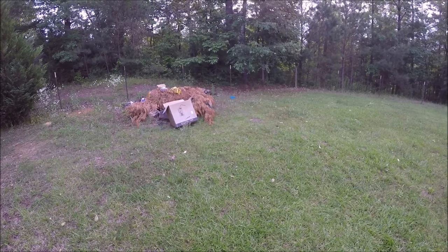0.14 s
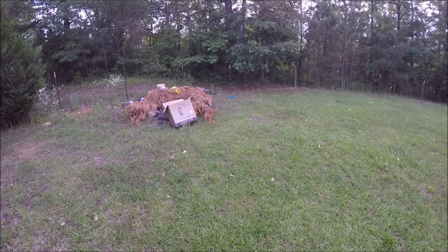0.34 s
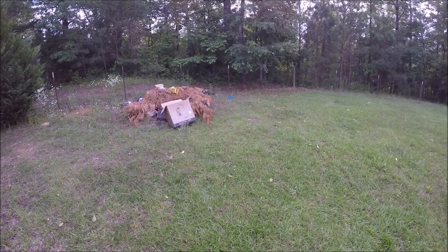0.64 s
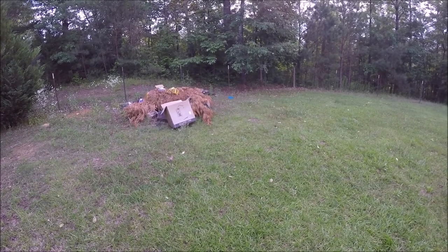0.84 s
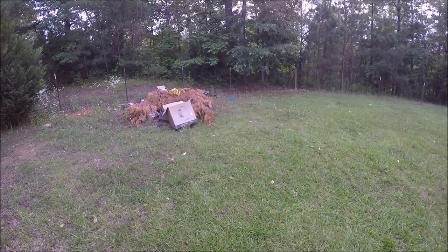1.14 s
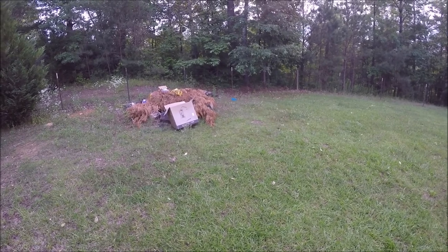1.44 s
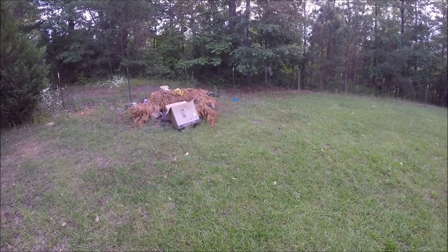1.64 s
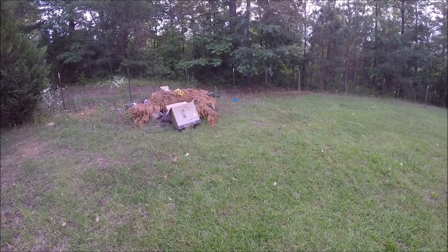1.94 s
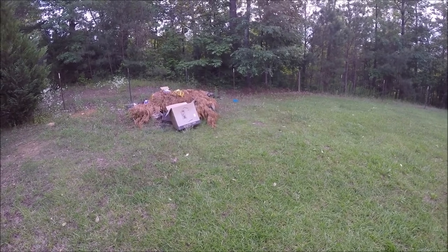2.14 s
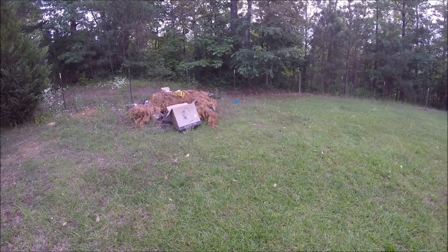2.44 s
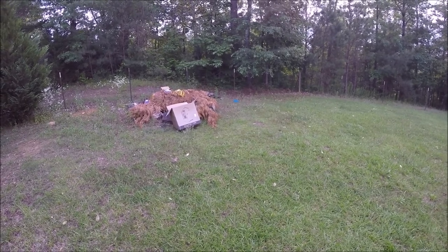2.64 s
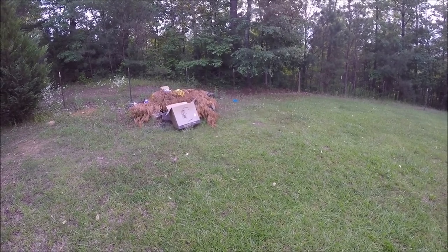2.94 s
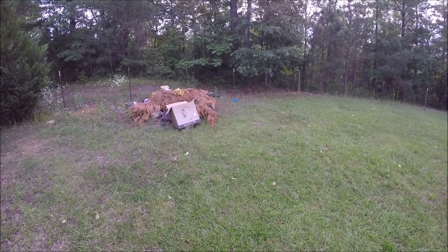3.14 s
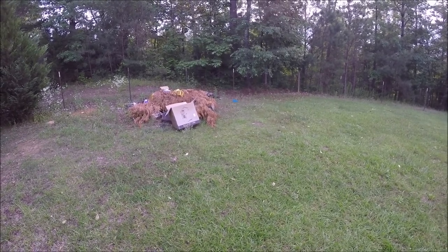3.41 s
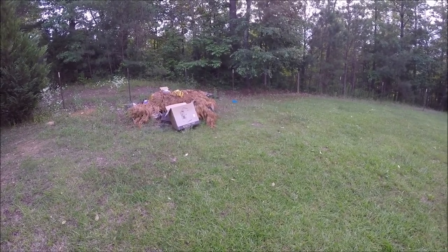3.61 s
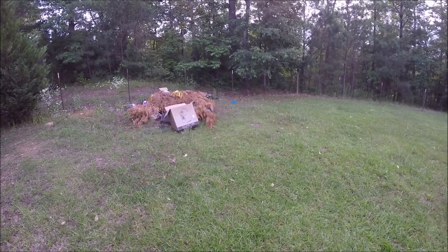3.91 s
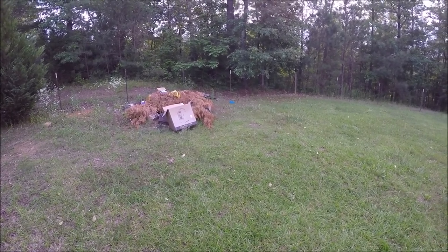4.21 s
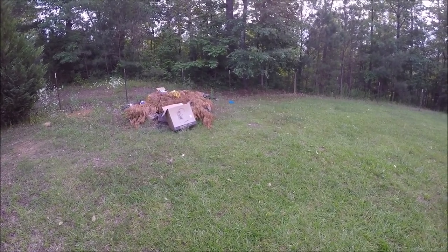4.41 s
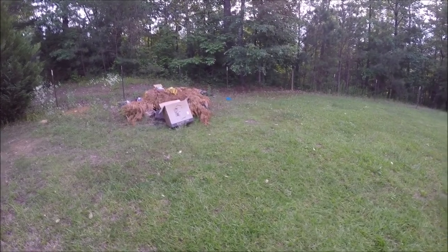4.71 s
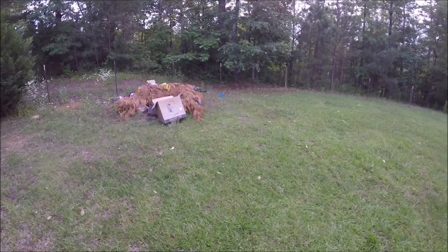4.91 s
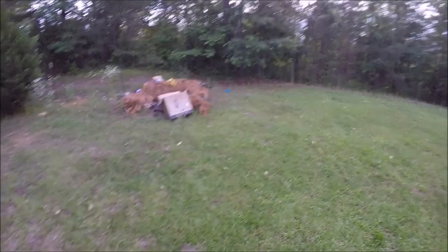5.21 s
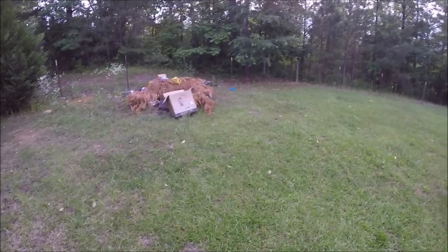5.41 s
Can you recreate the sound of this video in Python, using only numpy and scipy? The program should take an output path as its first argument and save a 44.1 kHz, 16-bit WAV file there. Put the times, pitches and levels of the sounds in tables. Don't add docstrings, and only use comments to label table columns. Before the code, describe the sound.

A close outdoor take beside an electric airsoft rifle, in a yard backed by trees. Faint air and a distant low engine hum, then a trigger click near 0.2 s and a brief motor wind-up. From 0.24 to 1.1 s, twelve sharp plastic-metal cracks rattle evenly with gear whine, the first ones loudest; each pellet smacks a hollow cardboard box about 55 ms after its shot. A soft woodland tail dies away. After a click at 1.48 s, thirteen more shots run from 1.56 to 2.5 s, with duller, drummier box hits. Small clicks and a low knock come around 2.6 s. The longest burst, nineteen shots, runs from 2.94 to 4.35 s; from about 3.9 s the hits mostly stop and the shots turn to hollow empty pops. The tail fades into quiet. From 5.0 s cloth rubs, a strap knocks at 5.25 s, and rustling, breeze and engine hum rise to the end at 5.5 s.

```python
import sys
import numpy as np
from scipy import signal
from scipy.fft import rfft, irfft, next_fast_len
from scipy.io import wavfile
from scipy.ndimage import uniform_filter1d

SR = 44100
rng = np.random.default_rng(int(sys.argv[2]) if len(sys.argv) > 2 else 0)


def natural_amplitude(level_db):
    exponent = np.asarray(level_db, float) / 20
    return 10 ** exponent


def transcribe(u):
    v = np.clip(np.atleast_2d(u).T, -1, 1)
    q = np.round(v * 32767).astype(np.int16)
    wavfile.write(sys.argv[1], SR, q)


N = 244843
AGE = np.arange(4000) / SR
CRACK_DB = -12.3

ROUNDS = [12, 13, 19]
EMPTY = [37, 39, 40, 41, 42, 43]


def amp_rms(x, db):
    return natural_amplitude(db) * x / np.sqrt(np.mean(x ** 2) + 1e-20)


def early_rms(x, db, size):
    return natural_amplitude(db) * x / np.sqrt(np.mean(x[:size] ** 2))


def coloured(spectrum, size):
    fast, points = next_fast_len(size), np.array(spectrum)
    hz = np.fft.rfftfreq(fast, 1 / SR) + 1
    gain_db = np.interp(np.log(hz), np.log(points[:, 0]), points[:, 1], left=-90, right=-90)
    noise = irfft(rfft(rng.standard_normal(fast)) * natural_amplitude(gain_db), fast)
    return amp_rms(noise[:size], 0)


def drift(rate_hz):
    return coloured([(1, 0), (rate_hz, 0), (4 * rate_hz, -24)], N)


def level(rows, column=1):
    rows = np.array(rows)
    return natural_amplitude(np.interp(np.arange(N) / SR, rows[:, 0], rows[:, column], left=-150, right=-150))


def struck(modes, vary_db=0, detune=0):
    hz, db, t60 = np.array(modes).T[:, :, None]
    chance = rng.standard_normal((2, len(modes), 1))
    waves = np.sin(2 * np.pi * hz * (1 + detune * chance[0]) * AGE)
    return np.sum(natural_amplitude(db + vary_db * chance[1] - 60 * AGE / t60) * waves, axis=0)


def puff(low_hz, high_hz, t60):
    band = signal.butter(2, [low_hz, high_hz], "band", fs=SR, output="sos")
    noise = signal.sosfilt(band, rng.standard_normal(len(AGE)))
    return amp_rms(noise, 0) * natural_amplitude(-60 * AGE / t60)


def add(track, s, sound):
    i = round(s * SR)
    track[i:i + len(sound)] += sound[:N - i]


def ground(x, taps, cut_hz):
    out, dull = x.copy(), signal.lfilter(*signal.butter(1, cut_hz, fs=SR), x)
    for s, db in taps:
        add(out, s, natural_amplitude(db) * dull)
    return out


def yard():
    # (time [s], frequency [Hz], level [dB])
    engine = [
        (0, 77, -7),
        (.35, 76.5, 6),
        (1.2, 79.5, -6.5),
        (1.598, 80, 0.5),
        (2.801, 77, -2),
        (3.1, 79, 4.5),
        (4.5, 78, -1),
        (4.85, 79, 10.5),
        (5.55, 80.5, 14),
    ]
    # (time [s], level [dB])
    breeze = [
        (0, 3.5),
        (.4, 0),
        (1.2, 0.5),
        (2.3, 0.5),
        (2.88, 6.5),
        (3.2, 4.5),
        (4.55, -7),
        (4.92, 2.5),
        (5.36, 12),
        (5.55, 10.5),
    ]
    # (frequency [Hz], density [dB/Hz])
    rumble_spectrum = [(13, -39), (22, -8.5), (49, 5.5), (65, 4), (86, -22), (95, 0), (119, -5),
                       (320, -49.5), (420, -68.5), (700, -120)]
    # (frequency [Hz], density [dB/Hz])
    air_spectrum = [(88, -42), (150, 2.5), (221, -7), (252, -3.5), (331, -18.5), (350, -15.5),
                    (1070, -11.5), (1230, -15.5), (5610, -28), (15000, -48)]
    clock = np.arange(N) / SR
    s, hz, line_db = np.transpose(engine)
    hz, line_db = np.interp(clock, s, hz), np.interp(clock, s, line_db)
    gust_db = np.interp(clock, *np.transpose(breeze))
    turn = 2 * np.pi * np.cumsum(hz + 1.55 * drift(6.2)) / SR
    hum = np.sqrt(2) * natural_amplitude(-56 + line_db + 2.3 * drift(9.3)) * np.sin(turn)
    rumble = natural_amplitude(-52.5 + 0.55 * gust_db + 4.3 * drift(11)) * coloured(rumble_spectrum, N)
    air = natural_amplitude(-57.5 + 0.73 * gust_db + 1.2 * drift(12)) * coloured(air_spectrum, N)
    return hum + rumble + air


def trees(x):
    # (frequency [Hz], density [dB/Hz])
    scatter = [(150, -14.5), (500, -9.5), (900, -1.5), (1050, -10.5), (1230, -4.5), (2500, -1.5), (4500, 6),
               (7000, 4.5), (15000, -13)]
    t60_s, reach_s, return_db = 0.99, 0.16, -16.5
    age = np.arange(30000) / SR
    shape = natural_amplitude(-60 * age / t60_s) * (1 - np.exp(-(age / 0.013) ** 2))
    hold = natural_amplitude(-5.5) + np.exp(-(age / reach_s) ** 4)
    tail = coloured(scatter, len(age)) * shape * hold
    return natural_amplitude(return_db) * signal.fftconvolve(x, tail / np.sqrt(np.sum(tail ** 2)))[:N]


def strokes():
    # (peak time [s], peak level [dB], rise [dB/s], fall [dB/s])
    sweeps = [
        (5.038, -59, 245, 23),
        (5.252, -51, 2900, 4300),
        (5.29, -46, 500, 300),
        (5.398, -45.5, 3195, 1000),
        (5.53, -43.5, 304, 200),
    ]
    clock = np.arange(N) / SR
    return sum(natural_amplitude(db - np.maximum(rise * (s - clock), fall * (clock - s))) for s, db, rise, fall in sweeps)


def handling():
    # (time [s], peak level [dB], frequency [Hz], t60 [s])
    ticks = [
        (0.169, -34, 1460, 0.0093),
        (0.187, -27, 1500, 0.0052),
        (1.481, -23, 1920, 0.0061),
        (2.589, -23, 4870, 0.0066),
        (2.653, -23, 1257, 0.013),
        (2.892, -36, 1436, 0.016),
        (5.25, -44.5, 882, 0.015),
        (5.269, -28, 915, 0.012),
    ]
    # (time [s], peak level [dB])
    rubs = [
        (5.0057, -48),
        (5.0258, -46),
        (5.0384, -41),
        (5.061, -45),
        (5.0901, -43),
        (5.111, -42),
        (5.275, -39.5),
        (5.3094, -51),
        (5.395, -49),
        (5.511, -43),
    ]
    # (time [s], level [dB])
    hollow = [
        (1.165, -70),
        (1.2, -42),
        (1.26, -55),
        (1.33, -61),
        (1.45, -80),
    ]
    # (frequency [Hz], density [dB/Hz])
    cloth = [(880, -45), (1500, 14), (1900, 5), (2920, 9), (3150, 9), (6960, 4), (13900, -5.5),
             (15500, -28)]
    out, slips = np.zeros(N), np.zeros(N)
    for s, db, hz, t60 in ticks:
        knock = struck([(hz, -3, t60), (1.55 * hz, -13, t60)])
        add(out, s, natural_amplitude(db) * (knock + natural_amplitude(-30) * puff(487, 7340, t60)))
    add(out, 5.2515, struck([(3895, -32, .0093), (6500, -52, .0063), (1500, -35, .012)]))
    add(out, 5.25, struck([(237, -37.5, 0.18), (151, -36, 0.083)]))
    add(out, 2.652, struck([(61.5, -30, 0.14)]))
    for s, db in rubs:
        add(slips, s, natural_amplitude(db - 4.5 - 60 * AGE / 0.045))
    rub = natural_amplitude(-5 + 2.7 * drift(53)) * strokes()
    ringing = level(hollow) * coloured([(960, -17), (1060, -10), (1160, -24)], N)
    rustle = coloured(cloth, N) * natural_amplitude(2.9 * drift(300) - 0.5) * (rub + slips)
    return out + ringing + rustle


def punch(burst, k):
    punch_db = [6.5, 6, 7.5]
    return punch_db[burst] * 0.6 ** k


def slams():
    peaks = [(0.24159), (0.32664), (0.40383), (0.47986), (0.55569), (0.63152), (0.70737), (0.78324),
             (0.85902), (0.93476), (1.0105), (1.09361), (1.56023), (1.64177), (1.71891), (1.79517),
             (1.87129), (1.94744), (2.02356), (2.09975), (2.17617), (2.25281), (2.3293), (2.40567),
             (2.48213), (2.94333), (3.03299), (3.11166), (3.18887), (3.26569), (3.34234), (3.41916),
             (3.49599), (3.57277), (3.64948), (3.72621), (3.80293), (3.87916), (3.95673), (4.0332),
             (4.11007), (4.18714), (4.26422), (4.34118)]
    slack = 38
    kind = {slack: (-16.5, -72), **{e: (-11, -22.5) for e in EMPTY}}
    rows = []
    for burst, count in enumerate(ROUNDS):
        for k in range(count):
            crack_db, pop_db = kind.get(len(rows), (CRACK_DB, -35))
            extra_db = punch(burst, k)
            rows.append((np.ravel(peaks)[len(rows)], crack_db + extra_db, pop_db + extra_db))
    return rows


def motor():
    # (length [s], start level [dB])
    wind_up = [
        (0.07, -50),
        (0.083, -43),
        (0.044, -54),
    ]
    bite_s, bite_db, run_db, sag_db_per_s = 0.03, -37.5, -34.5, 4.5
    let_go_s, coast_s, let_go_db, coast_db = 0.027, 0.051, -0.5, -23
    out, times = 0, np.split(np.array(slams())[:, 0], np.cumsum(ROUNDS))
    for (lead_s, start_db), (first, *_, last) in zip(wind_up, times):
        start = first - lead_s
        tired_db = run_db - sag_db_per_s * (last - first)
        out = out + level([(start, start_db), (start + bite_s, bite_db), (first, run_db),
                           (last - .1, tired_db), (last + let_go_s, tired_db + let_go_db),
                           (last + let_go_s + coast_s, tired_db + coast_db)])
    return out


def whine(hz, strays, jitter):
    turn = 2 * np.pi * np.cumsum(hz * (1 + jitter * drift(90))) / SR
    return sum(natural_amplitude(db + 4 * drift(50)) * np.sin((k + 1) * turn) for k, db in enumerate(strays))


def gearbox():
    # (frequency [Hz], density [dB/Hz])
    gears = [(250, -21.5), (600, 2), (1500, 2), (2400, 4), (3300, -8), (4300, 2.5), (5000, 5.5), (5800, -3),
             (6800, -10.5), (10000, -7), (15500, -13)]
    # (share of cycle [0-1], level [dB])
    spring_load = [(0, 17), (.25, -19.5), (.32, 4), (.55, 0), (.75, 0.5), (.9, 1.5), (1, 1)]
    # (share of cycle [0-1], frequency [Hz], level [dB])
    mesh = [(0, 2350, -14), (.28, 2640, -12), (.4, 2580, -6), (.55, 2500, -9), (.75, 2380, -2),
            (.9, 2240, -6), (1, 2200, -12)]
    # (time [s], frequency [Hz], level [dB])
    spin_up = [
        [(.17, 800, -64), (.2, 1200, -53), (.24, 1450, -51)],
        [(1.478, 1150, -58), (1.515, 1760, -49), (1.558, 1850, -53)],
        [(2.89, 1100, -64), (2.92, 1600, -53), (2.94, 1950, -53)],
    ]
    # (frequency [Hz], level under the crack [dB], t60 [s])
    pickup = [(4900, -13, .009), (1950, -15, .008), (5600, -18, .007), (8200, -24, .005), (2500, -20, .008)]
    times, clock = np.array(slams())[:, 0], np.arange(N) / SR
    coasted = times[np.cumsum(ROUNDS) - 1] + .09
    turns = np.sort(np.r_[0, times, coasted])
    share = np.interp(clock, turns, np.arange(len(turns))) % 1
    load = natural_amplitude(np.interp(share, *np.transpose(spring_load)) + 1.5 * drift(40))
    at, hz, db = np.transpose(mesh)
    starting = sum(level(rows, column=2) for rows in spin_up)
    teeth = whine(np.interp(share, at, hz), [-.5, -.5, -14], jitter=.02)
    teeth = natural_amplitude(np.interp(share, at, db)) * teeth * (starting < 1e-6)
    out = (coloured(gears, N) * load + teeth) * uniform_filter1d(motor(), size=300) * natural_amplitude(-4.5)
    rising = np.concatenate(spin_up)
    out += starting * whine(np.interp(clock, rising[:, 0], rising[:, 1]), [0, 0, -8], jitter=.04)
    for (s, crack_db, pop_db), period in zip(slams()[1:], np.diff(times)):
        if period < .12:
            clack = struck(pickup, vary_db=2, detune=.03) * natural_amplitude(-6 * (pop_db > -30))
            clack = clack + natural_amplitude(-28) * puff(1200, 9000, .02)
            add(out, s - .0555 - .3 * (period - .076), natural_amplitude(crack_db) * clack)
    return out


def landings():
    # (time [s], snap level [dB], panel level [dB], panel pitch [Hz])
    first_hits = [(.2966, -8, -23.5, 1216), (.3816, -16, -29, 1160), (.4588, -17.5, -22, 1173),
                  (.5349, -21.5, -27, 1140), (.6107, -18.5, -27, 1210), (.6868, -14.5, -33, 1220),
                  (.7626, -18.5, -27.2, 1200), (.8382, -16.5, -26.5, 1196), (.9143, -19, -27, 1180),
                  (.9901, -14, -32, 1160), (1.0683, -24, -28, 772), (1.1485, -15, -23.5, 1188)]
    # (time [s], snap level [dB], panel level [dB], panel pitch [Hz])
    second_hits = [(1.615, -9.5, -22, 1190), (1.6966, -13.5, -24, 1085), (1.7737, -13, -29, 1080),
                   (1.8496, -16, -22, 586), (1.926, -15, -27.5, 635), (2.0019, -14, -31.5, 1230),
                   (2.078, -18.5, -27.5, 775), (2.1547, -17, -28, 830), (2.231, -17, -26.5, 644),
                   (2.3075, -17.5, -29.5, 1170), (2.3875, -22.5, -34.5, 450), (2.4601, -21.5, -27, 626),
                   (2.5369, -15, -26.5, 652)]
    # (time [s], snap level [dB], panel level [dB], panel pitch [Hz])
    third_hits = [(2.9969, -11.5, -25.5, 1180), (3.087, -13, -33.5, 1170), (3.1657, -15.5, -24, 1020),
                  (3.2427, -16, -30.5, 654), (3.3194, -14, -31, 614), (3.3965, -16, -29, 746),
                  (3.4737, -15, -33.5, 740), (3.5499, -15, -33.5, 510), (3.6271, -16.5, -35.5, 1120),
                  (3.7036, -16, -29.5, 1120), (3.7808, -14.5, -28, 674), (3.8576, -16, -27.5, 660),
                  (4.011, -17, -31.5, 660)]
    # (wall [dB], drum [dB], extra drum on slack middle [dB], drum pitch [ratio], stiff edge [dB])
    aim = [
        (-28.5, -38, 3, 1.153, -2.5),
        (-26.5, -37.5, 7, 0.995, -1.5),
        (-29, -37, 1, 0.962, -1),
    ]
    lawn_s = [.00077, .00068, .00048]
    side_panels_db = [-5.5, 1.5, -1.5]
    rows = []
    for burst, hits in enumerate([first_hits, second_hits, third_hits]):
        wall_db, drum_db, middle_db, *colour = aim[burst]
        for k, (s, snap_db, panel_db, hz) in enumerate(hits):
            extra_db = punch(burst, k)
            wall = wall_db + 0.52 * extra_db + .25 * (panel_db + 27)
            drum = drum_db + 1.14 * extra_db + middle_db * (545 < hz < 700)
            rows.append((s, snap_db, wall, panel_db, hz, drum, *colour, lawn_s[burst],
                         side_panels_db[burst]))
    return rows


def box():
    # (frequency [Hz], level [dB], t60 [s])
    snap = [(5610, 10, 0.0036), (3820, -4, 0.007), (7680, 4.5, 0.0011), (2350, -5, 0.012)]
    # (frequency [Hz], level [dB], t60 [s])
    wall_modes = [(1700, 10.5, 0.026), (1480, -13.5, 0.014), (1920, -4.5, 0.016)]
    # (frequency [Hz], level [dB], t60 [s])
    panel_modes = [(660, -1.5, 0.014), (777, 6, 0.04), (1078, 6.5, 0.035), (560, -2.5, 0.04)]
    # (frequency [Hz], level [dB], t60 [s])
    drum_modes = [(197.5, 6.5, 0.048), (235, 0, 0.056), (284, -2.5, 0.056)]
    out = np.zeros(N)
    spike = -np.exp(-(AGE - .00007) ** 2 / .000033 ** 2)
    flex, swell = 1 - np.exp(-AGE / 0.00052), 1 - np.exp(-(AGE / 0.0058) ** 2)
    for s, snap_db, wall_db, panel_db, panel_hz, drum_db, tune, edge_db, lawn_s, side_db in landings():
        skin = struck([*snap, (3000, edge_db, 0.017)], vary_db=3.5, detune=.07)
        skin = natural_amplitude(snap_db - 3.5) * (skin + natural_amplitude(-23.5) * puff(2000, 9000, 0.036))
        wall = struck(wall_modes, vary_db=3, detune=.03) + natural_amplitude(3) * puff(1300, 2300, .04)
        panel = natural_amplitude(side_db) * struck(panel_modes, vary_db=3, detune=.04) + struck([(panel_hz, 10, .045)])
        panel = flex * (panel + natural_amplitude(side_db + 7) * puff(296, 1280, 0.085))
        drum = swell * struck(drum_modes * np.array([tune, 1, 1]), vary_db=2.5, detune=.05)
        body = skin + early_rms(wall, wall_db + 0.5, size=500) + early_rms(panel, panel_db - 0.5, size=700)
        off_grass = natural_amplitude(-7) * np.exp(-(AGE - .00007 - lawn_s) ** 2 / .00006 ** 2)
        blow = natural_amplitude(snap_db + 13.5) * (spike - off_grass) + np.roll(body, 5) * (AGE > .0001)
        if snap_db < -21.5:
            skid = rng.standard_normal(220) * np.hanning(220) / 9
            blow, s = np.convolve(blow, skid)[:len(AGE)], s - .0025
        add(out, s - .00005, blow + early_rms(drum, drum_db + 2, size=800))
    return ground(out, [(.0031, -22), (.0062, -18), (.0097, -15)], cut_hz=2100)


def rifle():
    # (frequency [Hz], level [dB], t60 [s])
    muzzle = [(6127, -3, .002), (8119, -7.3, .0017), (2057, -9, .0024), (12914, -14.5, .0015),
              (3427, -16, .0072)]
    # (frequency [Hz], level [dB], t60 [s])
    shell = [(5219, -1, .0021), (10845, -9.6, .0022), (1285, -19, .008), (4775, -26, .011)]
    # (frequency [Hz], level [dB], t60 [s])
    barrel = [(665, 2.5, 0.041), (724, 0, 0.026), (589, 0.5, 0.04), (927, -0.5, .03), (487, -5, 0.059),
              (2150, 7, 0.014), (2416, 1, 0.023), (1665, -3, 0.051)]
    # (frequency [Hz], level [dB], t60 [s])
    rebound = [(3770, -1.5, 0.007), (5970, -19, 0.03), (8000, -19, 0.01), (2500, -10, 0.0057),
               (9700, -16, .008), (5080, -9.5, 0.011)]
    # (frequency [Hz], level [dB], t60 [s])
    stock = [(230, -12.5, 0.027)]
    # (delay [s], level [dB])
    bore_echo = [(.00127, -9), (.0042, -13)]
    # (delay [s], level [dB])
    wood_edge = [(0.1066, -32.5), (0.1103, -27.5), (.131, -51)]
    out = np.zeros(N)
    swell = 1 - np.exp(-AGE / 0.00033)
    rumble_cut = signal.butter(2, 430, "high", fs=SR)
    for k, (s, crack_db, pop_db) in enumerate(slams()):
        empty = k in EMPTY
        crack = struck(muzzle, vary_db=.6, detune=.006) - struck(shell, vary_db=.6, detune=.006)
        crack = natural_amplitude(0.81 * (crack_db - CRACK_DB)) * crack * (AGE > .00012 * empty)
        add(out, s - .000165, crack + natural_amplitude(crack_db - 17) * puff(560, 6700, 0.079))
        if empty:
            for lag_s, db in bore_echo:
                add(out, s - .000165 + lag_s, natural_amplitude(db) * crack * natural_amplitude(-60 * AGE / .002))
        spit = puff(2500, 11000, 0.0027)
        add(out, s + .0004, natural_amplitude(crack_db - CRACK_DB - 10.5 - 10 * empty) * spit)
        bounce = struck(rebound, vary_db=1.5, detune=.015) + natural_amplitude(-15) * puff(1500, 12000, .03)
        add(out, s + 0.0047, natural_amplitude(crack_db - 4 - 1.2 * empty) * swell * bounce)
        pop = natural_amplitude(pop_db + 2) * (1 - np.exp(-AGE / .001)) * struck(barrel, vary_db=.4, detune=.004)
        thump = natural_amplitude(crack_db + 0.5) * (1 - np.exp(-AGE / 0.0012)) * struck(stock)
        add(out, s - .0009, thump - signal.lfilter(*rumble_cut, pop))
        lead = puff(2500, 14000, .009)[400::-1]
        add(out, s - 408 / SR, natural_amplitude(crack_db - 13) * lead)
    return ground(out, [(.0092, -20), *wood_edge], cut_hz=5500)


def scene():
    blows = rifle() + box()
    spread = signal.lfilter(*signal.butter(2, 3000, fs=SR), blows)
    for s, db, *_ in slams() + landings():
        add(spread, s, natural_amplitude(db + 15.5) * np.array([1, -.9]))
    return (blows + trees(spread) + gearbox() + handling() + yard())[None]


def starved(x):
    # (time [s], length [s], top [Hz], gap spacing [Hz], smear [0-1])
    stretches = [
        (.5605, .018, 5300, 2300, .1),
        (3.098, .031, 6300, 1800, .2),
        (3.374, .03, 8800, 1600, .35),
        (4.594, .024, 6800, 5000, 0),
        (4.72, .026, 6500, 4600, 0),
        (4.954, .022, 6500, 7000, 0),
        (5.326, .018, 8500, 14000, 0),
    ]
    out = x.copy()
    for s, length_s, top_hz, gap_hz, smear in stretches:
        i, size = round(s * SR), round(length_s * SR)
        frame = x[0, i:i + size] * signal.windows.tukey(size, .4)
        hz = np.fft.rfftfreq(size, 1 / SR)
        kept = (.05 + (np.abs(hz / gap_hz % 1 - .5) > 370 / gap_hz)) * (hz < top_hz)
        scatter = np.exp(1j * smear * np.pi * rng.standard_normal(len(hz)))
        thinned = irfft(rfft(frame) * kept * scatter, size)
        out[0, i:i + size] += thinned * signal.windows.tukey(size, .2) - frame
    return out


def top_cut(x):
    return signal.sosfilt(signal.butter(12, 16480, fs=SR, output="sos"), x)


def record(dry):
    low_pass = signal.cheby2(14, 60, 16800, fs=SR, output="sos")
    cut = signal.sosfilt(low_pass, np.clip(dry, -.95, .95))
    return top_cut(starved(cut))


dry = scene()
out = record(dry)
transcribe(out)
```